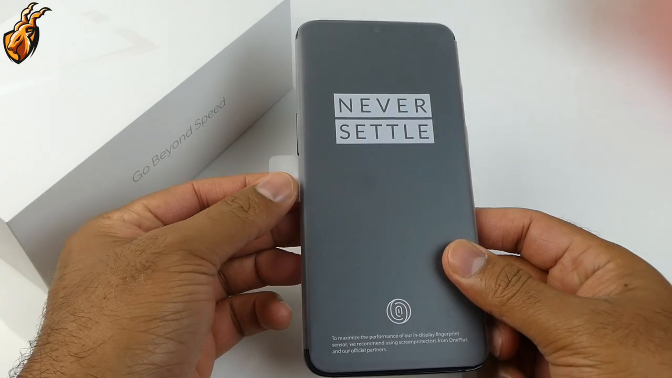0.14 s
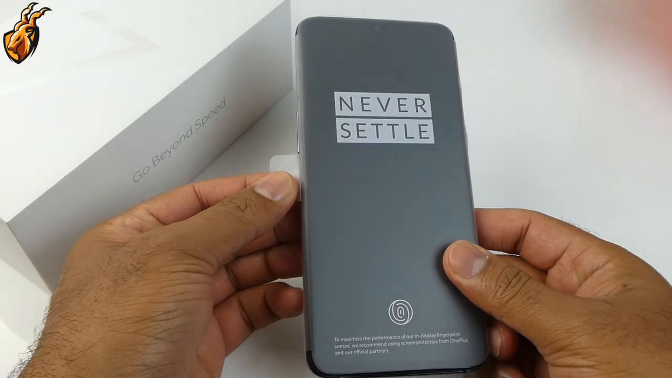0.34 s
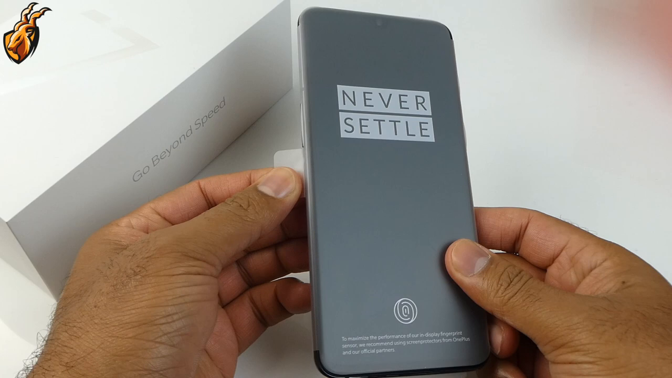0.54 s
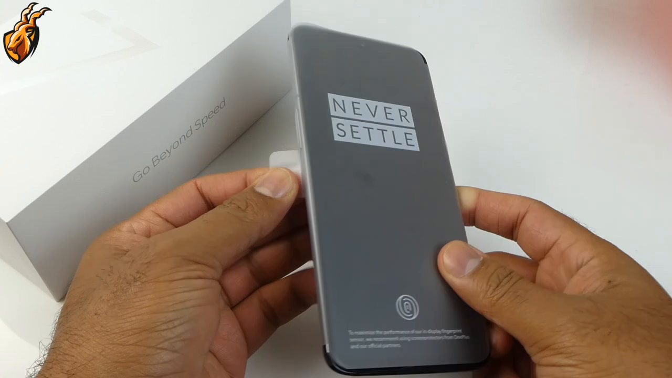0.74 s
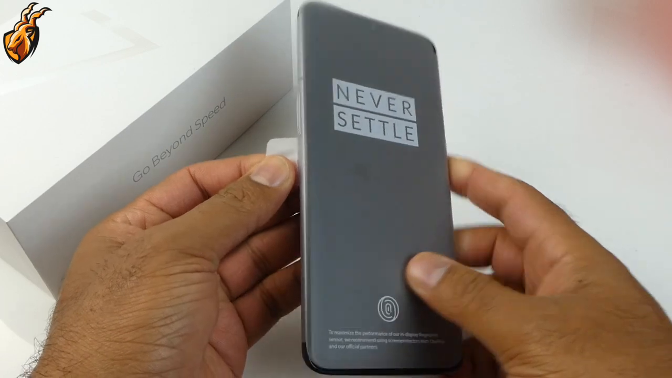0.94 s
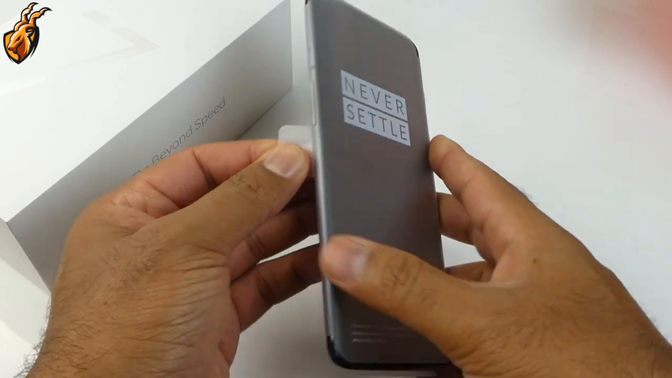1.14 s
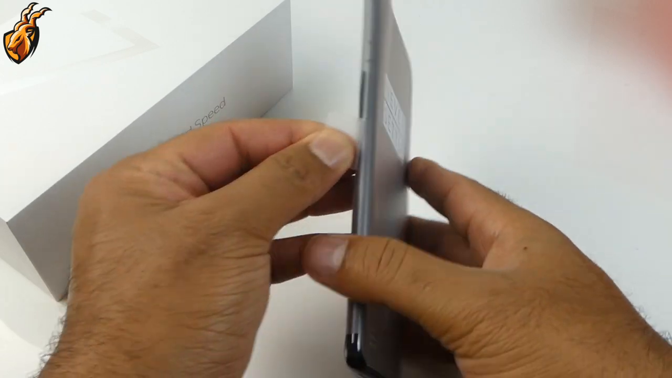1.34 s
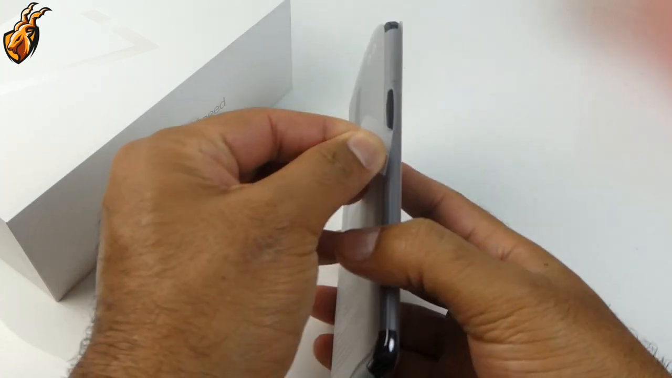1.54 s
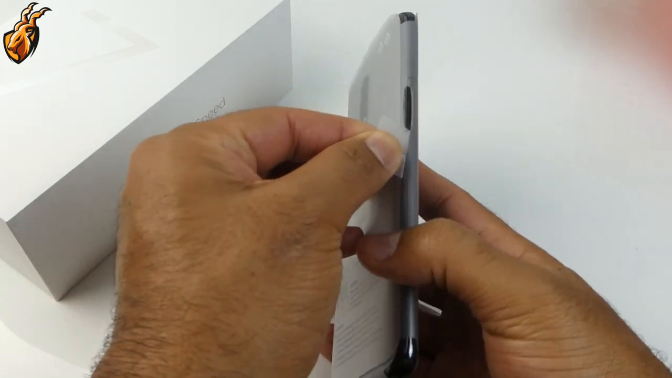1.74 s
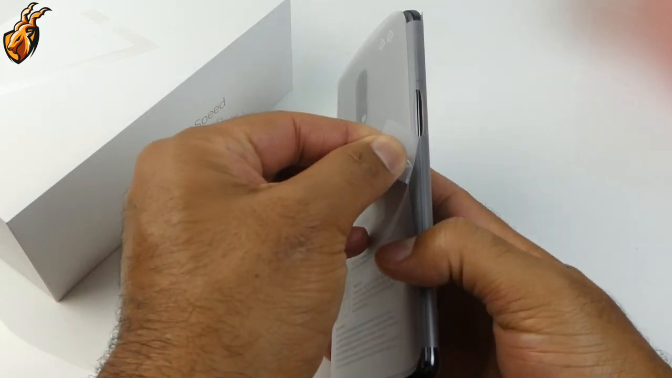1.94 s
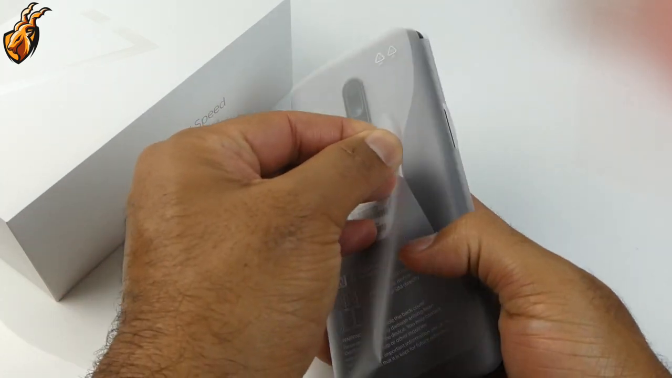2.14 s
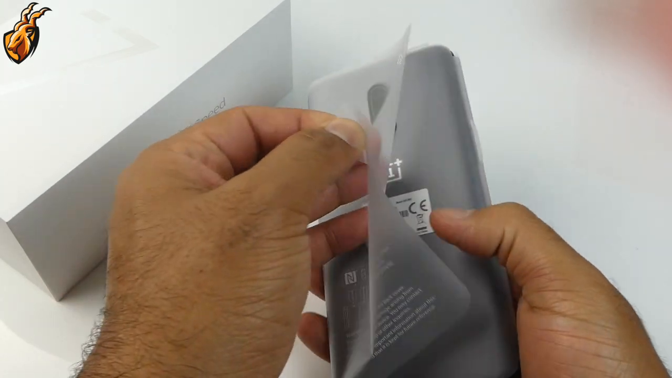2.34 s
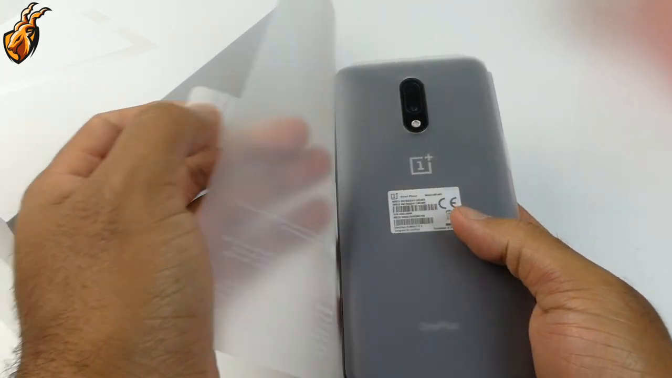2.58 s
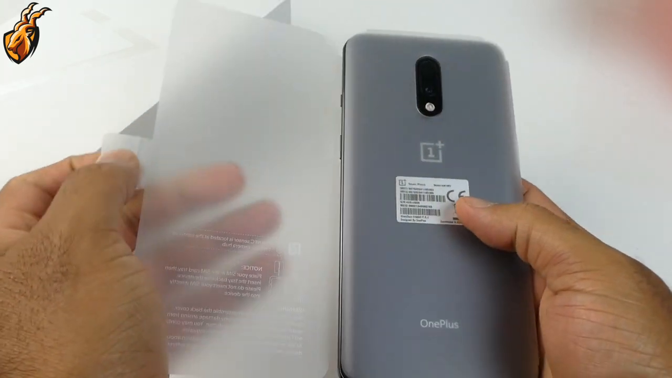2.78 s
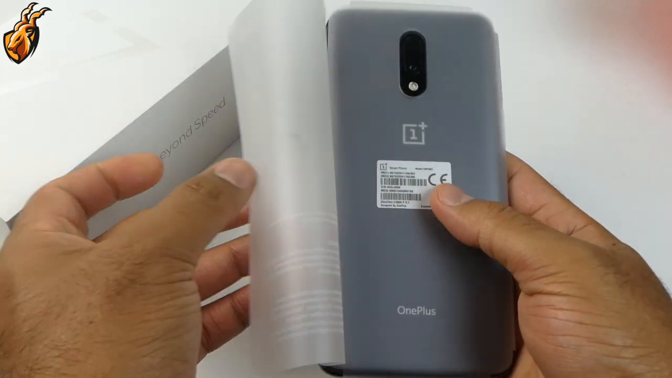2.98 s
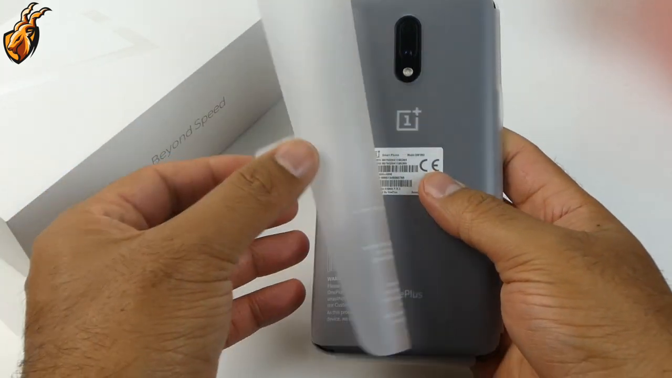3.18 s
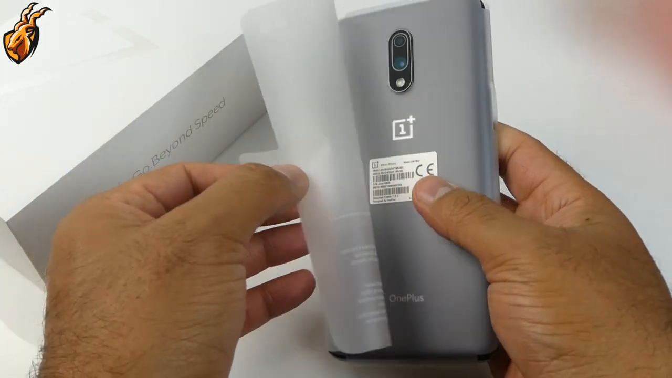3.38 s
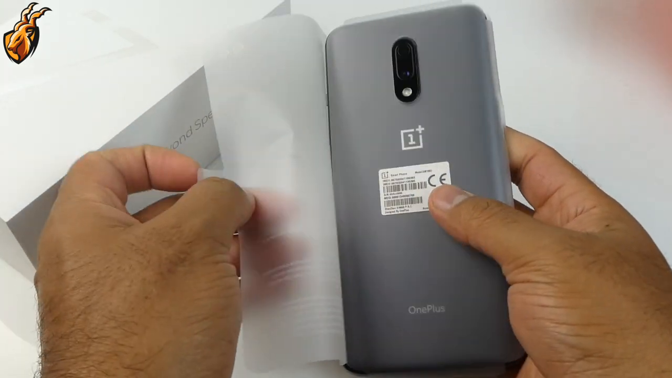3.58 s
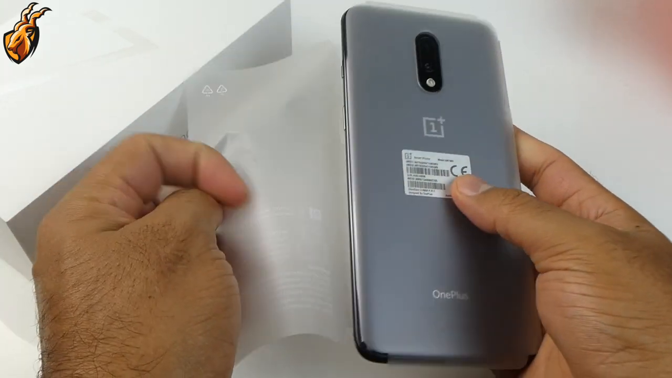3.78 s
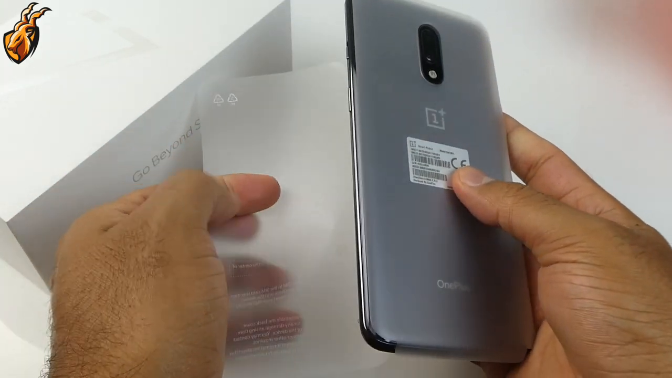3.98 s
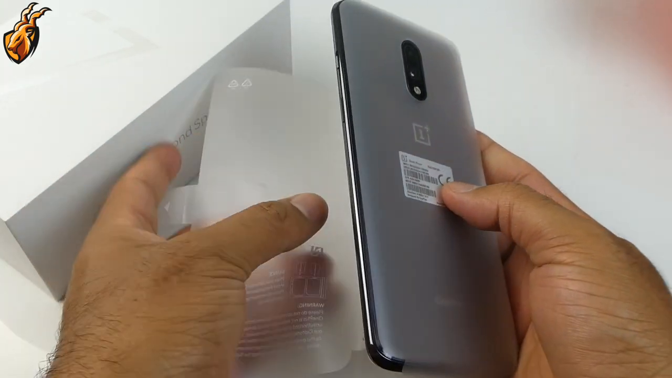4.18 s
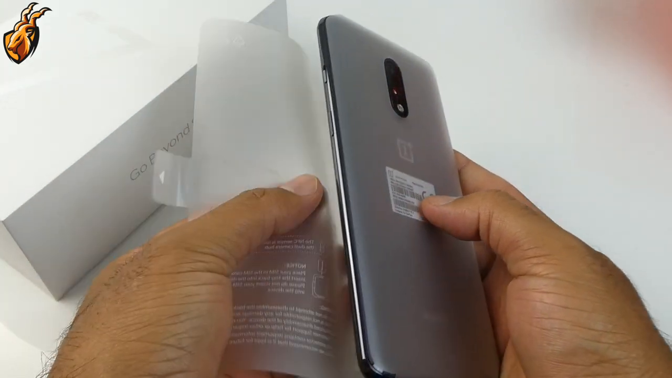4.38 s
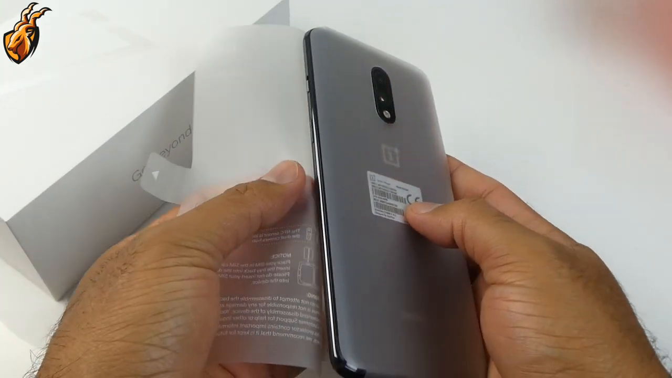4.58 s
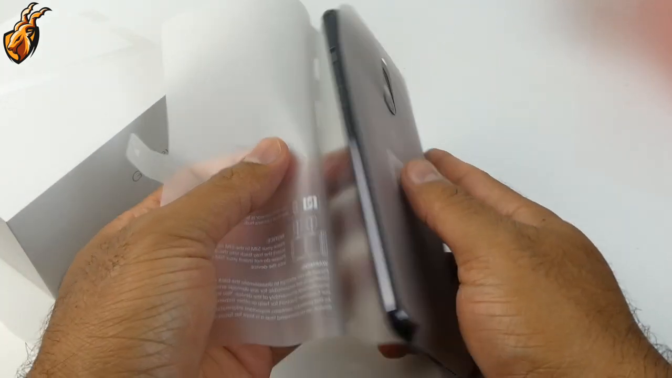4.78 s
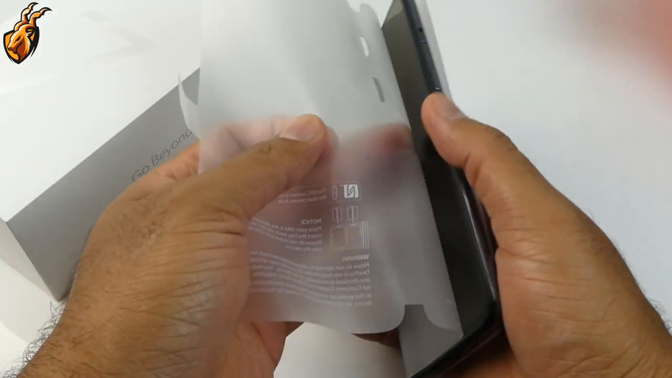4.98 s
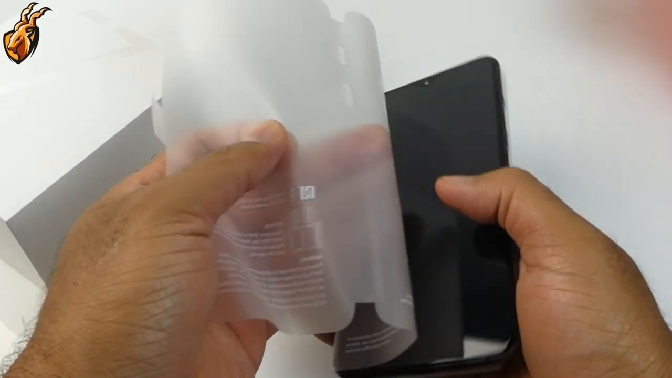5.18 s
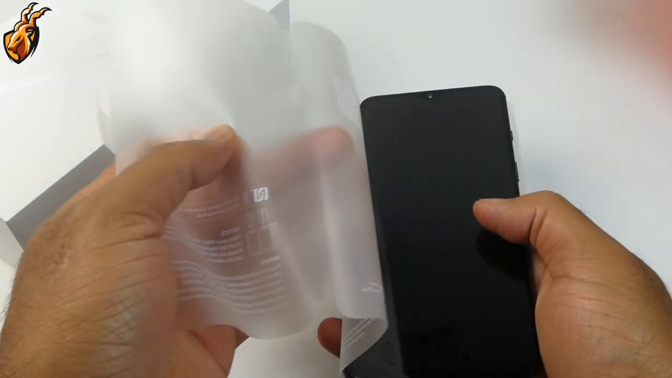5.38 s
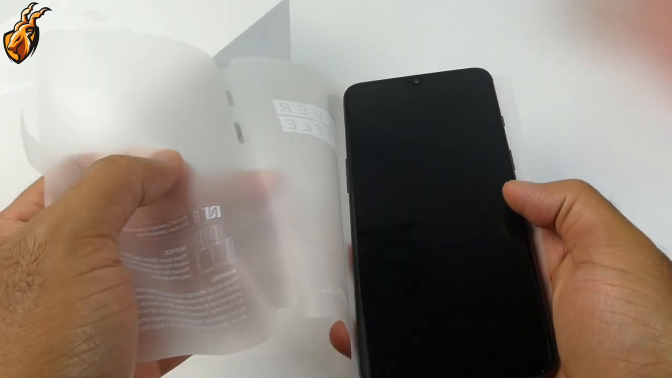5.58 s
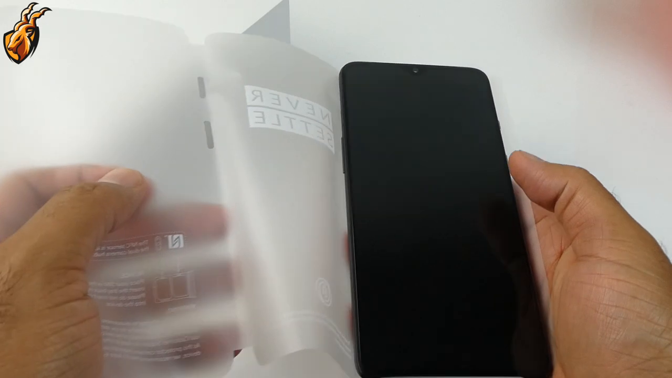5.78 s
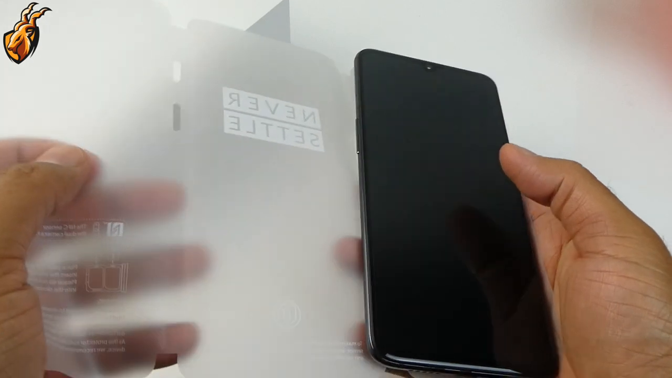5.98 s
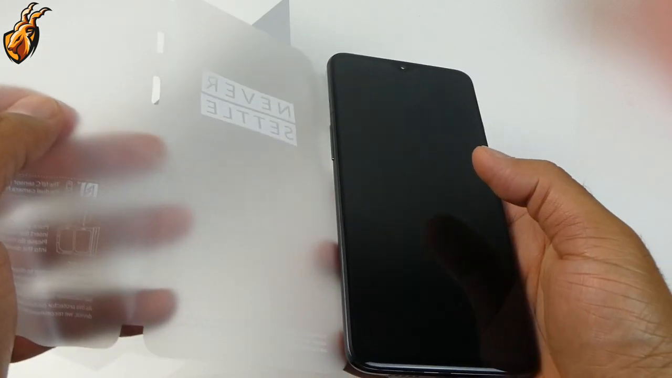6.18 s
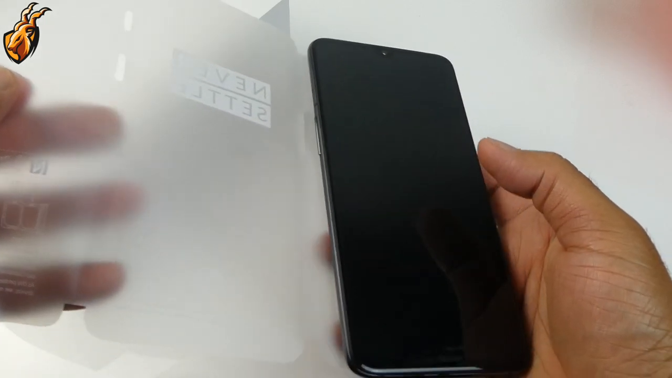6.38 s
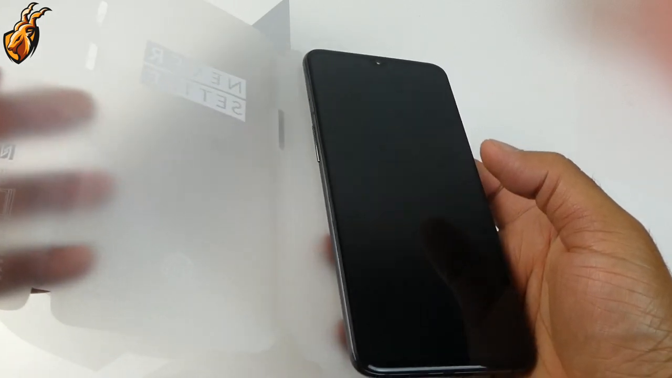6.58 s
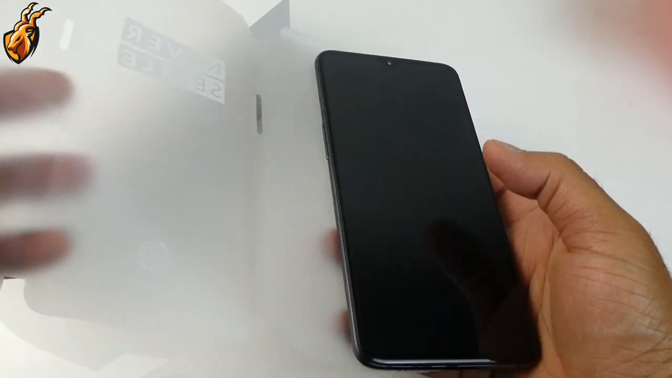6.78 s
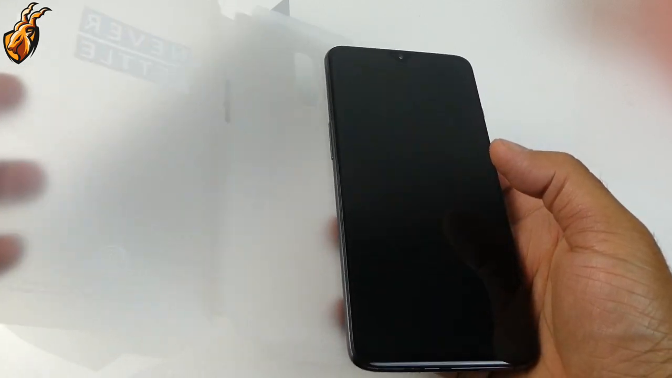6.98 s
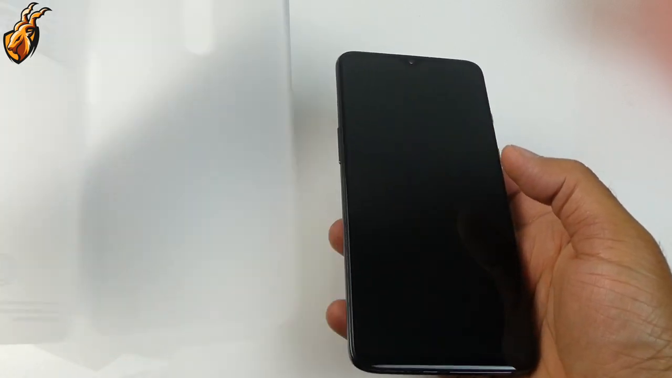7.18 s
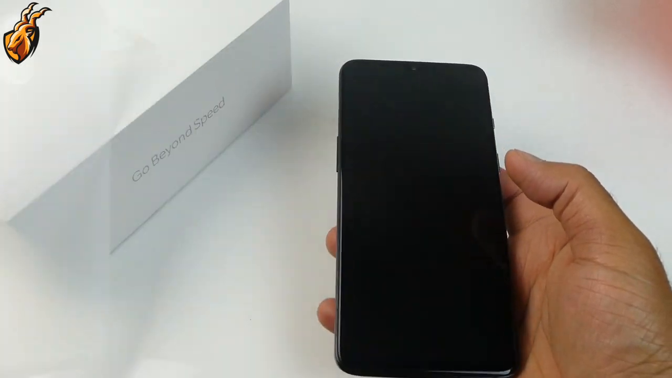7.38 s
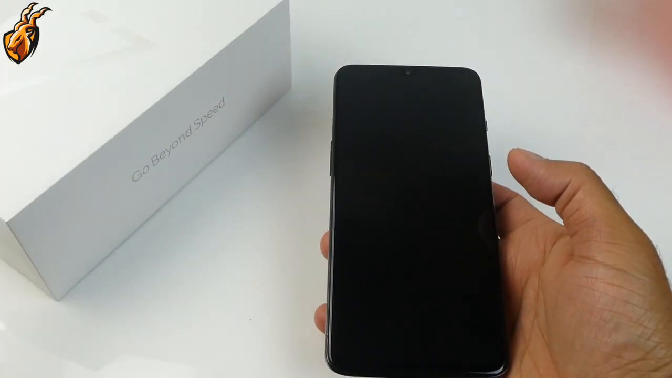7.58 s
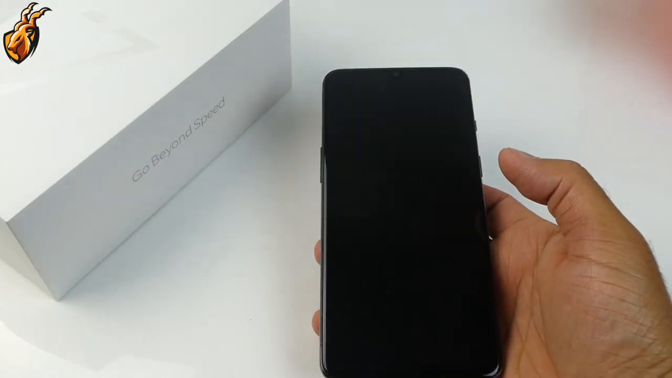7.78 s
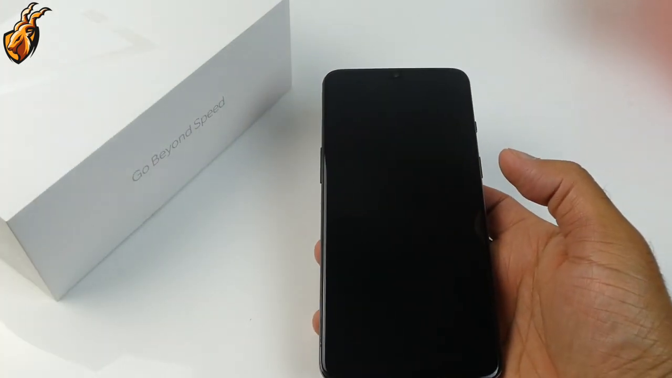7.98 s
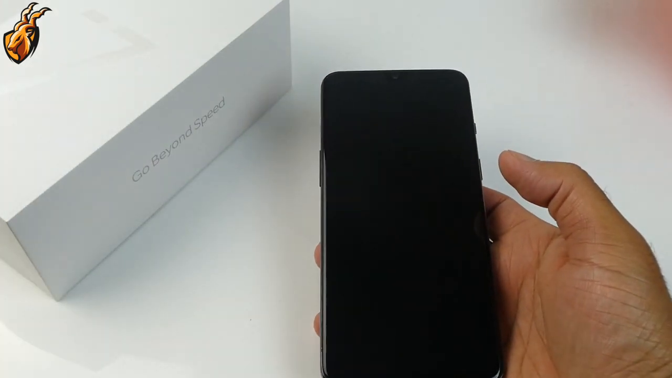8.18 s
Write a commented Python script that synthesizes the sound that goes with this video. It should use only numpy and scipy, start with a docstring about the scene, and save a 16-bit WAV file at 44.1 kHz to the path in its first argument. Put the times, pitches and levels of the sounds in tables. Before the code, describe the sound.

Thin plastic film peels off a phone close up: faint handling rustles, then dense crackling, sharp snaps and hissing slides, thinning to quiet.

```python
"""Film peeled off a phone

Hands turn a phone, peel its thin plastic wrapping film off and slide it away over a desk, close to the microphones.
In each stroke the sliding film hisses with tiny slips; crumpled film crackles as small wrinkles ring.
Creases snap through as noise bursts with a crack and a pop, among dry bright clicks; once the whole sheet
buckles in a few low cycles.
A small room answers with sparse echoes, and its steady noise swells and sinks with the recorder's gate."""
import sys
import numpy as np
from scipy import signal
from scipy.fft import rfft, irfft, next_fast_len
from scipy.io import wavfile
from scipy.ndimage import uniform_filter1d

SR = 44100
rng = np.random.default_rng(int(sys.argv[2]) if len(sys.argv) > 2 else 0)


def persist_wave(psi):
    """Save psi, clipped to +-1, as 16-bit WAV."""
    counts = np.round(np.clip(psi, -1, 1) * 32767).astype(np.int16)
    wavfile.write(sys.argv[1], SR, np.atleast_2d(counts).T)


N = 362502
TIME = np.arange(N) / SR
BINS = np.fft.rfftfreq(next_fast_len(N, real=True), 1 / SR)  # Hz
MS = np.arange(2048) * 1000 / SR  # time axis of one short event
ROOM_T60_S = 0.25

# shape of the film: (time [s], spread of slip sizes [dB per unit of size],
# pitch of the rubbed curl [Hz], sheen of the top treble [dB])
CRUMPLE = [(0.65, 2.5, 6540, 7.5), (2.0, -1.5, 5270, 17), (2.22, 1.5, 3020, 1), (2.55, 1.5, 2430, 4.5),
           (3.45, 2, 3250, 8), (4.5, 2.5, 3310, 1.5), (4.85, 2, 6400, 5), (5.15, 8.5, 3070, 10),
           (5.45, -2.5, 2610, -10), (6.35, -2.5, 4200, 5), (6.55, -0.5, 9200, -6), (7.1, -1.5, 10300, 11),
           (7.9, 0.5, 4770, 7)]


def amp(db):
    """Decibels to gain."""
    return 10 ** (np.asarray(db) / 20)


def unit(x):
    """Scales to an rms of one."""
    return x / np.sqrt(np.mean(x ** 2) + 1e-20)


def blow(x, db):
    """Scales a burst to the energy of one millisecond at this level."""
    return amp(db) * x / np.sqrt(np.sum(x ** 2) * 1000 / SR)


def read(points, hz):
    """Reads a spectrum on a log-frequency axis."""
    f, value = np.transpose(points)
    return np.interp(np.log(hz + 1), np.log(f + 1), value)


def colour(x, gain):
    """Filters a whole track by a gain for each frequency."""
    padded = next_fast_len(N, real=True)
    return irfft(rfft(x, padded) * gain, padded)[:N]


def band(x, low_hz, high_hz, order=2):
    """Causal band-pass."""
    edges = np.clip([low_hz, max(high_hz, low_hz + 20)], 20, SR / 2 - 100)
    return signal.sosfilt(signal.butter(order, edges, "band", fs=SR, output="sos"), x)


def whiten(x, order):
    """Evens out the spectrum of a burst, smoothed over so many bins, keeping its onset."""
    z = np.fft.fft(x)
    power = abs(uniform_filter1d(abs(z) ** 2, size=order, mode="wrap"))
    log_gain = .5 * np.log(power + 1e-12)
    # the matching minimum phase keeps the burst from smearing ahead of its onset
    return np.fft.ifft(z * np.exp(-signal.hilbert(log_gain).conj())).real


def wander(rate_hz):
    """Slow random motion of unit size."""
    return unit(colour(rng.standard_normal(N), 1 / (1 + (BINS / rate_hz) ** 2)))


def add(mix, s, sound):
    """Mixes a sound in at a time."""
    part = mix[max(round(s * SR), 0):][:len(sound)]
    part += sound[:len(part)]


def overlay(at, grains):
    """Lays one grain at each of the given samples of a whole track."""
    places = at[:, None] + np.arange(grains.shape[1])
    return np.bincount(places.ravel(), grains.ravel(), N)[:N]


def air(level_db=-57):
    """Wide, steady room noise, ahead of the gate."""
    # still air of the room: (frequency [Hz], level [dB per Hz])
    still_air = [(50, -28), (150, -3), (280, 2.5), (390, 2.5), (480, 5.5), (620, -0.5), (2500, -9),
                 (10000, -13.5), (15500, -26)]
    # low rumble reaches the two microphones largely out of step: (frequency [Hz], side against mid [dB])
    air_width = [(700, 10), (2500, 5.5), (6000, -6)]
    mid, side = (unit(colour(rng.standard_normal(N), amp(read(still_air, BINS)))) for _ in range(2))
    side = colour(side, amp(read(air_width, BINS)))
    return amp(level_db) * np.array([mid + side, mid - side])


def effort(attack_s=0.03, attack_share=0.049, release_s=0.024, arch_db=0.1):
    """Gains of flexing, crinkle and hiss: each stroke has an attack, a growing or easing hold, and a release."""
    # strokes of the fingers and pulls of the film, ahead of the overall rubbing level:
    # (start [s], length [s], crinkle [dB], growth from start to end [dB],
    # surface hiss against crinkle [dB], flexing against crinkle [dB])
    strokes = [(0.0, 0.084, -55, -31, 0.5, 5), (0.611, 0.028, -50, 5, 12.5, -20),
               (0.704, 0.076, -54.5, -2, 3.5, -4), (0.9, 0.28, -59, 6, 10, -4),
               (1.261, 0.24, -64, 15.5, 4.5, -4.5), (1.648, 0.054, -68.5, -6, -13.5, 17),
               (1.925, 0.2, -63.5, 28, 12, -3.5), (2.108, 0.046, -36.5, 4, 9, -7),
               (2.163, 0.033, -33.5, 8.5, -5, -13), (2.23, 0.16, -38, 2, 0.5, -13.5),
               (2.451, 0.18, -43, -7, 3, -8), (2.65, 0.11, -44, -1, 5, -7), (2.867, 0.052, -52, 6, 6, 5.5),
               (2.938, 0.12, -47.5, 7, -3, -6.5), (3.09, 0.22, -61.5, 9, -7, -0.5),
               (3.338, 0.062, -39.5, -2, -4, -13), (3.453, 0.058, -34.5, -15.5, 2.5, -13.5),
               (3.541, 0.09, -38.5, 2, 2.5, -4), (3.665, 0.21, -48, 11, 4, -2.5),
               (3.823, 0.092, -36, 4, -0.5, -7), (3.895, .13, -36.5, -1.5, 2.5, 1.5),
               (4.084, 0.23, -37, 0.5, -0.5, -3.5), (4.356, 0.11, -28.5, -5, -3, -5),
               (4.555, 0.17, -32.5, -8.5, -1, -8), (4.744, 0.13, -42.5, 15.5, 5, -6),
               (4.908, 0.15, -48, -19, -1, 0.5), (5.09, 0.14, -38.5, 7.5, 1, -7),
               (5.257, 0.41, -50, -14.5, -1.5, -6), (5.688, 0.31, -49, 5, -1, -4),
               (6.008, 0.1, -43, -10, -5.5, 4.5), (6.146, 0.13, -48.5, 16.5, -2.5, -3.5),
               (6.267, 0.28, -48.5, -8.5, 4.5, -3.5), (6.485, 0.24, -46, 0, 5, -13.5),
               (6.683, 0.22, -52, -4.5, 2, -7.5), (6.873, 0.33, -49, 6, 4, -6),
               (7.266, 0.2, -51.5, -1, -14, 1.5), (7.43, 0.17, -53, -11.5, 8, -4.5),
               (7.608, 0.26, -56, -12, -4.5, -1), (7.892, 0.025, -46, 1, -3, 4.5),
               (7.974, 0.05, -43, -2.5, -7.5, -10.5), (8.06, 0.18, -55, -1, -2.5, -8)]
    # the held film never lies quite still: (flexing [dB], crinkle [dB], surface hiss [dB])
    resting = (-73, -82.5, -71.5)
    power = amp(resting)[:, None] ** 2 * np.ones(N)
    for start, length, level_db, growth_db, hiss_db, flex_db in strokes:
        t = np.arange(0, length + 10 * release_s, 1 / SR)
        # a long stroke gathers speed more slowly
        attack = np.minimum(t / (attack_s + attack_share * length), 1)
        release = np.exp(-np.maximum(t - length, 0) / release_s)
        progress = np.minimum(t / length, 1)
        arch = arch_db * (np.sin(np.pi * progress) - 2 / np.pi)  # a slight swell towards the middle
        hold_db = level_db + growth_db * (progress - .5) + arch
        for track, gain in zip(power, amp(hold_db + np.array([[flex_db], [0], [hiss_db]]))):
            add(track, start, (attack * gain * release) ** 2)
    return np.sqrt(power)


def slips(per_s, spread_db, chance, size, grain_ms=0.4):
    """A train of tiny noise scratches of uneven size, a few of them large; even in power over time."""
    at = np.flatnonzero(chance < per_s / SR)
    ms = np.arange(56) * 1000 / SR
    scratches = rng.standard_normal((len(at), len(ms))) * np.exp(-ms / grain_ms)
    train = overlay(at, scratches * amp(spread_db * size)[at, None])
    return train / np.sqrt(abs(uniform_filter1d(train ** 2, size=1500)) + 1e-9)


def catches(per_s=55, relax_s=0.0055):
    """The film sticks and lets go at random: each release is a jump that relaxes quickly."""
    jumps = rng.random(N) * (rng.random(N) < per_s / SR)
    tension = signal.lfilter([1], [1, -np.exp(-1 / (relax_s * SR))], jumps)
    return np.minimum(tension - tension.mean(), 1)


def bending(x, curl_db=4, curl_octaves=0.063, sway_octaves=0.087, patchy_db=2.2, sheen_hz=12000):
    """As the film bends, the resonances of curl and sheet glide and sway, and its colour shifts in patches."""
    # resonances of the curved sheet: (frequency [Hz], width [Hz], boost [dB])
    sheet_modes = [(720, 74, 1), (1150, 92, 2.5)]
    hz, t, z = signal.stft(x, SR, nperseg=1024, noverlap=768)
    s, _, curl_hz, sheen_db = np.transpose(CRUMPLE)
    swayed = (hz[:, None] + 1) * 2 ** (sway_octaves * np.interp(t, TIME, wander(8.7)))
    octaves_off = np.log2(swayed / np.interp(t, s, curl_hz))
    curl = curl_db * np.exp(-.5 * (octaves_off / curl_octaves) ** 2)
    sheet = sum(db / (1 + (2 * (swayed - centre) / width) ** 2) for centre, width, db in sheet_modes)
    sheen = np.interp(t, s, sheen_db) * (1 - 1 / (1 + (hz[:, None] / sheen_hz) ** 10))
    patches = uniform_filter1d(rng.standard_normal(z.shape), size=8, axis=0)
    patches = unit(uniform_filter1d(patches, size=6, axis=1))
    bent = z * amp(curl + sheet + sheen + patchy_db * patches)
    return signal.istft(bent, SR, nperseg=1024, noverlap=768)[1][:N]


def rubbing(gains, flex_hz=1480, hiss_hz=4900, judder_db=6, drift_db=2.4, flat_share=0.32, catch_per_db=0.15):
    """Slips shake the whole sheet (low), its wrinkles (middle) and its surface (high)."""
    # colour of the rubbing: (frequency [Hz], level [dB per Hz])
    film_colour = [(60, -41), (135, -12.5), (300, -7), (1100, 1.5), (1500, -1), (2800, 4.5), (4600, 3.5),
                   (8000, -2), (10500, -0.5), (13000, -12), (16000, -15.5)]
    flex_gain, crinkle_gain, hiss_gain = gains
    spread_db = np.interp(TIME, *np.transpose(CRUMPLE)[:2])
    # the three parts share these draws: a random share of the slips is common to all three
    chance, size = rng.random(N), np.minimum(rng.exponential(1, N), 5)
    film = amp(read(film_colour, BINS))
    above_flex, above_crinkle = (1 - 1 / (1 + (BINS / hz) ** 12) for hz in (flex_hz, hiss_hz))
    judder = judder_db * catches()
    catching = np.clip(flat_share + catch_per_db * spread_db, .2, 1.3)  # flat film slides more evenly

    def part(gain, share, per_s):
        sound = unit(colour(slips(per_s, spread_db, chance, size), film * np.sqrt(share)))
        return sound * gain * amp(catching * (judder + drift_db * wander(25)))

    flex = part(flex_gain, 1 - above_flex, per_s=2000)
    crinkle = part(crinkle_gain, above_flex * (1 - above_crinkle), per_s=4500)
    hiss = part(hiss_gain, above_crinkle, per_s=6500)
    return bending(flex + crinkle + hiss)


def crackle(crinkle_gain, level_db=-4.0, per_s=170, spread_db=4.0, low_hz=1100, high_hz=8000, cycles=1.6,
            crumple_gain=2.5, crumpled_db=3.0):
    """Where the film is crumpled, small wrinkles flip over at random, each ringing briefly at its own pitch."""
    t = np.arange(512) / SR
    chance, place, size = rng.random(N), rng.random(N), np.minimum(rng.exponential(1, N), 3)
    at = np.flatnonzero(chance < per_s / SR)
    hz = low_hz * (high_hz / low_hz) ** place[at, None]
    strength = amp(spread_db * size[at, None]) * np.sqrt(hz)
    rings = strength * np.sin(2 * np.pi * hz * t) * np.exp(-hz * t / cycles)
    train = overlay(at, rings)
    # flatter film than crumpled_db crackles less, by crumple_gain dB for each dB of spread
    flatness_db = np.minimum(np.interp(TIME, *np.transpose(CRUMPLE)[:2]) - crumpled_db, 0)
    return unit(band(train, 450, 15000)) * crinkle_gain * amp(level_db + crumple_gain * flatness_db)


def ticks(run_ms=1.9, low_hz=1500, high_hz=11000):
    """Short, bright noise bursts without a pop."""
    # dry, bright clicks, some beside a snap or buckle: (time [s], level of the burst as one millisecond [dB])
    clicks = [(0.11, -56), (0.15, -49), (0.551, -39.5), (0.645, -44), (1.267, -38), (1.35, -38),
              (2.64, -27), (3.751, -27.5), (3.863, -18), (3.899, -26), (3.913, -21), (3.925, -19.5),
              (4.184, -26), (4.247, -22.5), (4.355, -24.5), (4.407, -21), (4.864, -21.5), (5.129, -32),
              (5.14, -30), (5.148, -20.5), (5.166, -23), (5.187, -19.5), (5.215, -28.5), (5.343, -26),
              (5.48, -25), (6.023, -35), (7.382, -43), (7.435, -29.5)]
    out = np.zeros(N)
    for (s, db), noise in zip(clicks, rng.standard_normal((len(clicks), len(MS)))):
        burst = whiten(noise * abs(noise) * np.exp(-MS / run_ms), order=70)
        add(out, s, blow(band(burst, low_hz, high_hz, order=1), db))
    return out


def snaps(pop_ring_ms=1.4, crack_ring_ms=0.46, shiver_db=-21, shiver_ms=8, flap_db=-15, flap_ms=5,
          partner_ratio=0.73, partner_db=-6, crack_span=1.79, splash_db=-12, rise_share=0.11,
          tick_db=-10.5, tick_reference_hz=3090, tick_db_per_octave=19):
    """A crease runs as a burst of slips: it ticks, cracks at the pitch of its fold and pops the sheet's bulge."""
    # creases snapping, levels as one millisecond: (time [s], pop [dB], pop pitch [Hz],
    # crack [dB], crack pitch [Hz], time the crease runs [ms])
    creases = [(2.615, -22.5, 1170, -25, 1885, 1.4), (2.643, -23, 1180, -17.5, 3000, 5),
               (2.657, -30, 400, -26, 2080, 5.5), (2.777, -38, 800, -44, 2200, 2.2),
               (2.916, -28.5, 1110, -34, 2760, 9.9), (3.409, -25.5, 440, -19, 2820, 3.6),
               (3.819, -24.5, 910, -13, 3470, 2.7), (3.829, -23, 1100, -20.5, 4300, 3.1),
               (3.87, -22, 1090, -10, 2940, 1.7), (3.965, -21.5, 890, -22.5, 1640, 0.64),
               (4.125, -22, 1050, -18, 2240, 9.9), (4.385, -22, 1100, -12.5, 3450, 6.6),
               (4.413, -30, 1000, -16.5, 3250, 3.6), (4.448, -18.5, 1040, -15.5, 5100, 2.9),
               (4.561, -15.5, 1130, -18.5, 2860, 6.7), (4.596, -26, 1070, -17, 4670, 7.8),
               (4.677, -23, 1040, -23, 3300, 2.9), (4.698, -29, 1070, -16.5, 2640, 1.5),
               (4.7124, -37, 1030, -17, 3900, 1.3), (4.833, -23, 1140, -31, 2200, 1.3),
               (4.889, -18, 900, -19, 5100, 2), (4.894, -9, 1030, -10.5, 2340, 3.2),
               (4.929, -29, 830, -21.5, 5840, 2), (4.943, -24.5, 800, -24.5, 2500, 2),
               (5.012, -17, 830, -14.5, 2520, 1.04), (5.026, -22, 1000, -27, 2190, 1.2),
               (5.195, -44, 1130, -18, 5270, 1.9), (5.197, -41.5, 1120, -17.5, 2300, 2.2),
               (5.246, -32.5, 1000, -23, 2200, 1.4), (5.333, -19.5, 930, -14.5, 2640, 0.97),
               (5.482, -23.5, 1090, -10.5, 2640, 2), (5.562, -27.5, 1100, -20, 2300, 0.77),
               (5.816, -27, 1150, -24, 2080, 0.74), (5.822, -21, 1230, -21.5, 1720, 2.6),
               (5.908, -25, 1060, -30, 1700, 1.3), (5.943, -27, 960, -31, 1900, 3.9),
               (6.056, -19.5, 930, -16, 2160, 4), (6.061, -12.5, 1144, -19, 3150, 5),
               (6.538, -27, 1520, -23, 4560, 2.9), (6.722, -27.5, 527, -24, 3050, 2.3),
               (6.769, -32.5, 950, -52, 2220, 0.48), (7.131, -22, 1090, -22.5, 2280, 5.7),
               (7.313, -23.5, 500, -23.5, 2200, 8.2), (7.327, -17.5, 1340, -19, 2370, 1.25),
               (8.009, -39, 1370, -33, 3640, 2.3)]
    out = np.zeros(N)
    draws = rng.standard_normal((len(creases), 4, len(MS)))

    def ring(x, hz, decay_ms):
        response = np.exp(-MS / decay_ms) * np.cos(2 * np.pi * hz * MS / 1000)
        return signal.fftconvolve(x, response)[:len(MS)]

    for (s, pop, pop_hz, crack, crack_hz, run_ms), noise in zip(creases, draws):
        run = MS / max(run_ms, .2)
        dying = (1 - np.exp(-run / rise_share)) * np.exp(-run)
        dying = dying + amp(shiver_db) * np.exp(-MS / shiver_ms)  # the sheet shivers after the crease
        burst = [whiten(row * abs(row) * dying, order=34) for row in noise[:3]]
        # the bulge's long side rings lower
        partner = amp(partner_db) * ring(burst[2], partner_ratio * pop_hz, pop_ring_ms)
        bulge = ring(burst[0], pop_hz, pop_ring_ms) + partner
        bulge = blow(band(bulge, 0.32 * pop_hz, 1400), pop)
        fold = ring(burst[1], crack_hz, crack_ring_ms) + 4 * burst[1]
        fold = blow(band(fold, crack_hz / crack_span, crack_hz * crack_span, order=3), crack)
        splash = blow(band(burst[0], 2000, 6400), crack + splash_db)
        # a sharper fold cracks higher and its edge ticks more
        tick = crack + tick_db + tick_db_per_octave * np.log2(crack_hz / tick_reference_hz)
        edge = blow(band(burst[2], 5560, 11100), tick)
        flap = whiten(noise[3] * np.exp(-MS / flap_ms), order=12)  # the sheet flaps on
        flap = blow(band(flap, 180, 560), pop + flap_db)
        add(out, s, bulge + fold + splash + edge + flap)
    return out


def buckles(swell_ms=1.55, low_hz=135):
    """The bulge flips over in a few cycles; a slacker sheet sounds lower and longer, and no bass radiates."""
    # the whole sheet buckles, then flaps back: (time [s], level [dB], tautness as a factor on pitch [1])
    flips = [(4.247, -9, 1), (4.266, -22, 1.05), (4.297, -28, 0.49)]
    # modes of the buckling sheet: (frequency at tautness one [Hz], level [dB])
    bulge_modes = [(270, -13.5), (745, -0.5), (1200, -8)]
    out = np.zeros(N)
    for s, db, taut in flips:
        ms = MS * taut
        modes = sum(amp(level) * np.sin(2 * np.pi * hz * ms / 1000) for hz, level in bulge_modes)
        add(out, s, amp(db) * modes * ms / swell_ms * np.exp(1 - ms / swell_ms))
    return band(out, low_hz, 6000, order=4)


def reflections(t60_s, first_s):
    """Sparse echoes of even colour, dying away."""
    t = np.arange(SR // 2) / SR
    taps = rng.standard_normal(len(t)) * (rng.random(len(t)) < .15) * (t > first_s)
    return whiten(taps * amp(-60 * t / t60_s), order=50)


def space(x, width, room_db, desk=0.097, half_turns_per_s=4.3, count=3):
    """Desk and room answer faintly; echoes change as the film turns, and differ at the two microphones."""
    lag = round(.0026 * SR)  # the detour over the desk, 2.6 ms
    x = x + desk * np.pad(x, (lag, 0))[:N]
    mid, side = x, 0
    for k in range(count):
        facing = x * np.sqrt(2 / count) * np.cos(np.pi * (half_turns_per_s * TIME + k / count))
        mid = mid + amp(room_db) * signal.oaconvolve(facing, reflections(ROOM_T60_S, 0.0036))[:N]
        scatter = reflections(0.017, 0) + .5 * reflections(ROOM_T60_S, 0)
        side = side + signal.oaconvolve(facing, scatter / np.linalg.norm(scatter))[:N]
    side = colour(side, amp(read(width, BINS)))
    return np.array([mid + side, mid - side])


def scene(rubbing_db=-3.0):
    """Rubbing, crackling, snapping and buckling film in the room."""
    # stereo side level of the rubbing and crackle: (frequency [Hz], side against mid [dB])
    rubbing_side = [(200, -7), (900, -8.5), (3500, -16.5), (7500, -30), (12500, -3)]
    # stereo side level of snaps, ticks and buckles: (frequency [Hz], side against mid [dB])
    snap_side = [(200, -8), (1000, -17.5), (3000, -15), (7500, -18), (12500, -6.5)]
    # the freed film swings out to the left, heard in its snaps: (time [s], left against right [dB])
    swing = [(5.9, 0.4), (6.06, 3.5), (6.5, -0.5), (7.3, 4)]
    gains = effort()
    film = rubbing(gains) + crackle(gains[1])
    sliding = amp(rubbing_db) * space(film, rubbing_side, room_db=-9.0)
    snapping = space(snaps() + ticks() + buckles(), snap_side, room_db=-11.5)
    left_db = np.interp(TIME, *np.transpose(swing))
    return sliding + snapping * amp([left_db / 2, -left_db / 2]) + air()


def gate(x, threshold_db=-51.0, depth_db=12, open_s=0.3, close_s=0.17):
    """A slow noise gate: it opens while something sounds and turns everything down in the pauses."""
    hop = 220  # samples between gate steps
    level_db = 10 * np.log10(abs(uniform_filter1d(x.mean(0) ** 2, size=900))[::hop] + 1e-12)
    opening = [.5]
    for wanted in np.clip((level_db - threshold_db) / 2, 0, 1):
        lag_s = open_s if wanted > opening[-1] else close_s
        opening.append(opening[-1] + (wanted - opening[-1]) * hop / SR / lag_s)
    return x * amp(depth_db * (np.interp(TIME, TIME[::hop], opening[1:]) - 1))


def record(dry, edge_hz=16000):
    """The recorder's noise gate and band limit."""
    low_pass = signal.firwin(511, edge_hz, window=("kaiser", 9), fs=SR)
    return signal.oaconvolve(gate(dry), low_pass[None], "same")


dry = scene()
out = record(dry)
persist_wave(out)
```